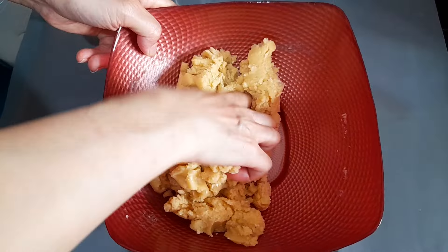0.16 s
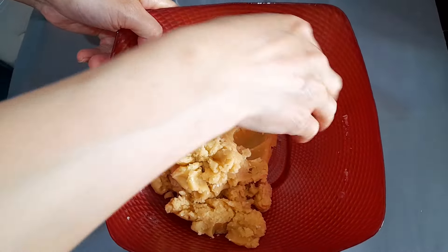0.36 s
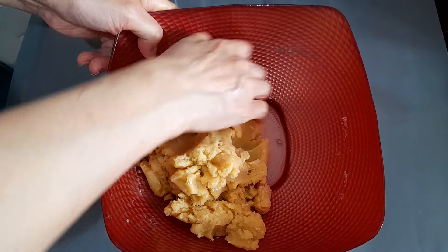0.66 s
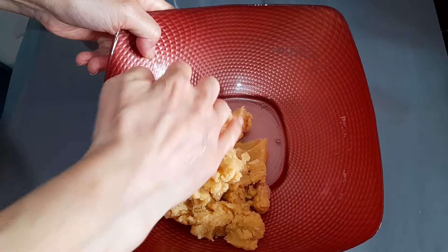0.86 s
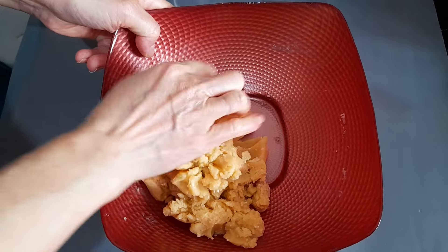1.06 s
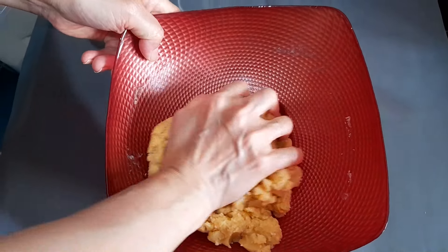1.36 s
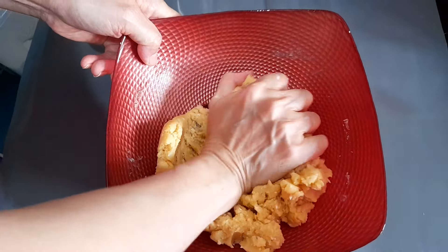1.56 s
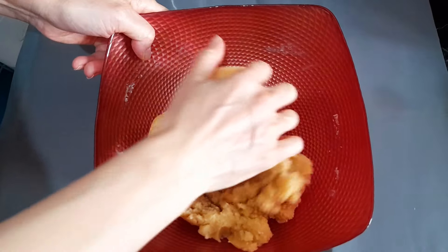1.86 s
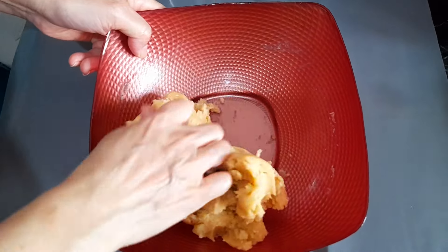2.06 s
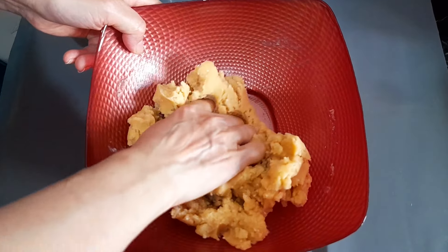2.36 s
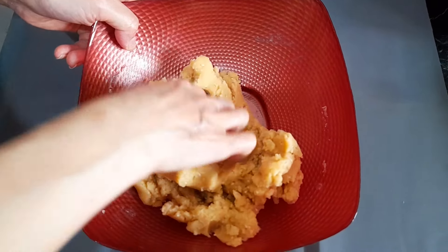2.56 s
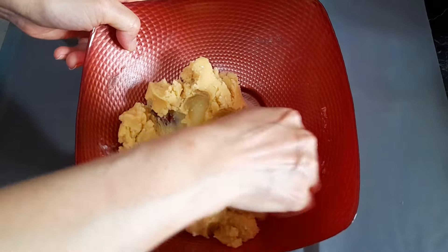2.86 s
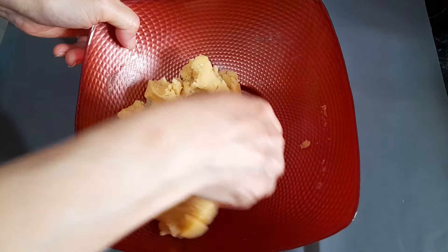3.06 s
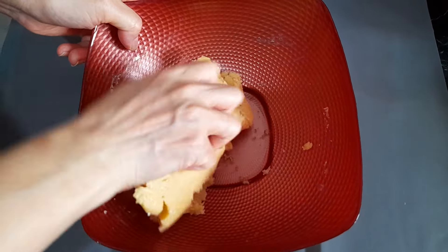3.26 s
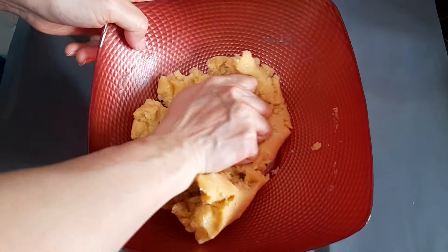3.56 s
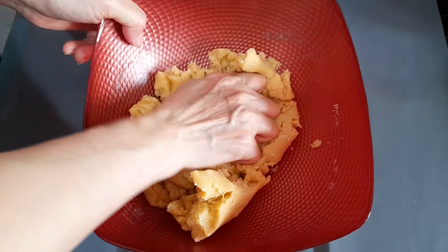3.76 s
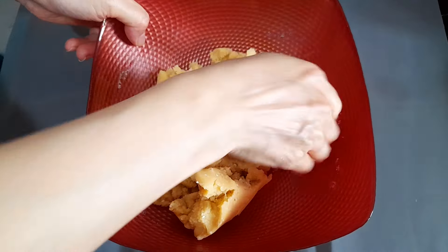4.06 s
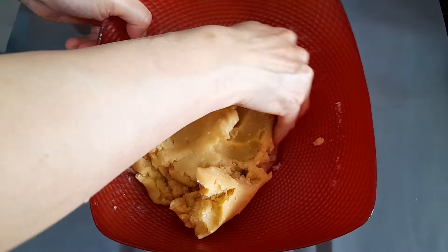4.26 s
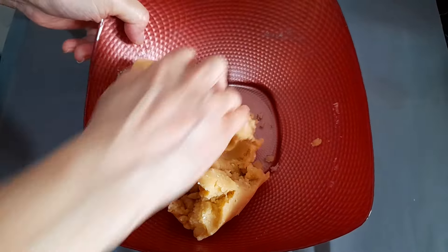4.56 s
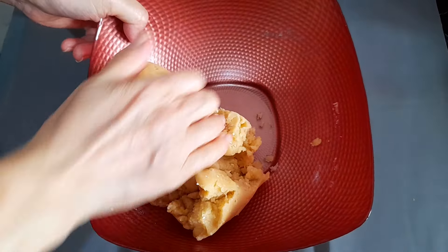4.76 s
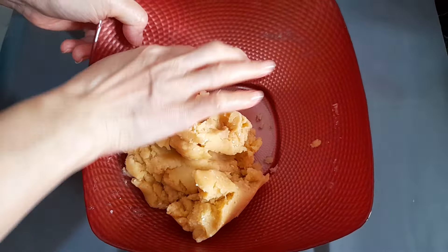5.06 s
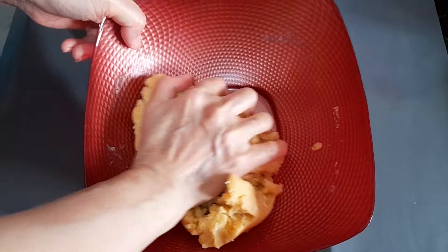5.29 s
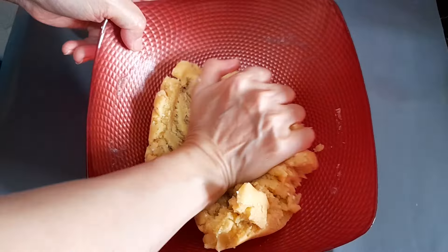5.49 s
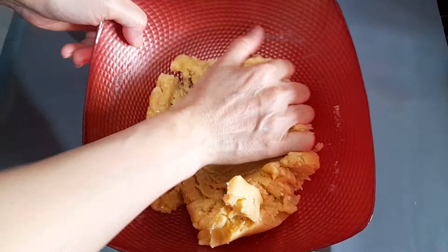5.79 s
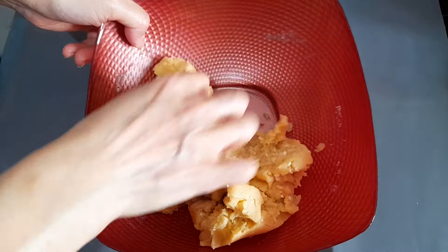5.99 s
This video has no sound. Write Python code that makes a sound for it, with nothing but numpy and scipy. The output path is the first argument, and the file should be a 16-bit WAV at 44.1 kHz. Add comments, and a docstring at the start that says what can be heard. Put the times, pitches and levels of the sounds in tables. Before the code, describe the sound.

Sticky dough is pressed and folded, fizzing and squelching as each push rocks the plastic bowl against the table with low, hollow knocks.

```python
"""Kneading cookie dough in a bowl

A hand kneads soft, oily cookie dough in a plastic bowl that the other hand steadies on a kitchen table.
Each push rocks the bowl with a dull judder, made from bounces that ring its modes, and slaps the dough.
Random tiny snaps become the dough's fizz, its gliding squelches, the rub along the wall and a rumble.
Short noise bursts make finger ticks and knuckle bumps, wavering tones the faint squeaks of the bowl's foot.
"""
import sys
import numpy as np
from scipy import signal
from scipy.fft import rfft, irfft, next_fast_len
from scipy.io import wavfile

SR = 44100
rng = np.random.default_rng(int(sys.argv[2]) if len(sys.argv) > 2 else 0)


def waveform_to_disk(signal):
    """Save audio, clipped to [-1, 1], as 16-bit WAV at the path in sys.argv[1]."""
    frames = np.transpose(np.atleast_2d(signal))
    scaled = np.clip(frames, -1, 1) * 32767
    samples = np.round(scaled).astype(np.int16)
    wavfile.write(sys.argv[1], SR, samples)


N = 270333

# the hand grips, drags or presses the dough; levels are before each sound's own trim:
# start_s, attack_s, hold_s, release_s, fizz_level_db, rub_level_db
DOUGH_STROKES = [(0.0, 0.0017, 0.027, 0.36, -55.5, -67.5), (0.148, 0.074, 0.08, 0.087, -52.5, -57),
                 (0.446, 0.0086, 0.062, .08, -70, -64), (0.553, 0.061, 0.13, 0.13, -60.5, -62),
                 (0.717, 0.033, 0.15, 0.38, -57, -64), (1.068, 0.02, 0.014, 0.065, -57, -42),
                 (1.215, 0.048, 0.081, 0.24, -59.5, -65), (1.383, 0.038, 0.2, 0.17, -49, -54.5),
                 (1.75, 0.029, 0.11, .06, -49.5, -54), (1.858, 0.029, 0.019, 0.098, -44.5, -53.5),
                 (1.955, 0.02, 0.11, 0.42, -56.5, -66), (2.186, .01, .06, .05, -57.5, -62),
                 (2.231, 0.072, 0.049, 0.14, -53, -57.5), (2.493, 0.083, 0.017, 0.017, -51, -57),
                 (2.831, 0.02, 0.03, 0.19, -56.5, -61.5), (2.967, 0.0098, 0.084, 0.055, -57, -58),
                 (3.039, 0.049, 0.052, .14, -45.5, -59), (3.275, 0.1, 0.084, 0.13, -57.5, -66),
                 (3.445, 0.076, 0.038, 0.52, -53.5, -60), (3.759, 0.11, 0.038, 0.028, -45.5, -50.5),
                 (4.095, 0.0035, 0.017, 0.043, -64, -64), (4.185, 0.0056, 0.16, 0.47, -59.5, -65),
                 (4.383, 0.11, 0.1, 0.22, -53.5, -62), (4.696, .04, 0.13, 0.36, -69, -100),
                 (4.974, .015, 0.027, .03, -66.5, -91), (5.04, 0.14, 0.34, .12, -61, -70),
                 (5.274, 0.18, 0.21, .19, -50, -61), (5.737, 0.048, 0.054, 0.026, -51.5, -46.5),
                 (5.82, 0.11, 0.012, 0.13, -47, -53.5), (6.049, 0.013, .02, 0.056, -63.5, -62.5)]
# the bowl rocks against the table; the hard contact is relative to the thud, before a common lift:
# start_s, peak_db, hard_contact_db, judder_length_s, lean_hold_s
BOWL_ROCKS = [(0.002, -41, -13.5, 0.011, 0.062), (0.097, -37, -27.5, 0.046, 0.39),
              (0.464, -41.5, -13.5, .023, 0.071), (0.493, -38.5, -12.5, 0.041, 0.3),
              (0.797, -49, -13, 0.052, 0.33), (1.097, -35, -5, 0.045, 0.028),
              (1.254, -42, -6.5, 0.035, 0.19), (1.368, -30, -15.5, 0.044, 0.087),
              (1.542, -27.5, -19, 0.04, 0.074), (1.799, -38.5, -12.5, 0.032, 0.1),
              (2.007, -52.5, -48, 0.055, 0.089), (2.137, -47.5, -45, 0.0082, 0.015),
              (2.285, -30.5, -19, 0.029, .13), (2.478, -40.5, -28, 0.058, 0.27),
              (2.855, -45.5, -18, 0.056, 0.036), (3.011, -25, -13.5, 0.028, 0.2),
              (3.451, -24.5, -21.5, 0.0389, 0.52), (3.79, -29, -17, 0.031, 0.13),
              (4.099, -43, -17.5, 0.058, 0.13), (4.2, -36, -18, 0.022, 0.026),
              (4.5, -47.5, -40, .04, 0.041), (5.091, -45, -14, 0.017, 0.073),
              (5.189, -44, -12.5, 0.023, 0.067), (5.311, -44, -22.5, 0.03, 0.091),
              (5.777, -33.5, -18, 0.044, 0.28)]
# fingers and crumbs tick on the wall: start_s, peak_db, pitch_hz
WALL_TICKS = [(0.202, -33.5, 8500), (0.4955, -44, 6650), (0.629, -45, 1520), (1.012, -52, 7440),
              (1.288, -47, 2820), (1.316, -32, 7640), (2.839, -43.5, 7000), (3.694, -48, 4970),
              (4.096, -42, 7600), (4.125, -42, 6100), (4.202, -44, 7310), (4.494, -36, 3760),
              (5.164, -44.5, 3440)]
# air and oil squeeze out under the fingers: start_s, length_s, first_pitch_hz, last_pitch_hz, level_db
WET_GLIDES = [(0.202, 0.14, 2550, 3050, -57.5), (1.089, 0.0595, 3150, 2880, -45),
              (1.286, 0.032, 1920, 2540, -55), (1.787, 0.077, 1900, 2940, -55.5),
              (1.892, 0.04, 2007, 2340, -54.5), (2.573, 0.025, 2980, 3180, -65),
              (2.648, 0.11, 2220, 2690, -71.5), (2.975, 0.026, 2110, 2220, -51),
              (3.481, 0.077, 2150, 2380, -56.5), (5.718, 0.09, 2050, 2440, -57)]
# knuckles bump the wall: start_s, peak_db, brightness_hz
WALL_BUMPS = [(0.281, -46.5, 990), (1.105, -45, 2500), (1.317, -42, 1440), (3.175, -59, 605),
              (3.794, -39.5, 620), (5.161, -48, 780), (5.383, -41, 730)]
# the foot of the bowl slips on the table: start_s, length_s, pitch_hz, level_db
FOOT_SLIPS = [(4.668, 0.079, 930, -74), (4.765, 0.13, 917, -76.5), (5.103, 0.1, 954, -67),
              (5.181, .12, 986, -58), (5.295, 0.048, 950, -68)]
# rocking modes of the loaded bowl: pitch_hz, width_hz, gain_db
BOWL_MODES = [(73, 32, -6.5), (99.7, 10.3, 3.5), (134, 26.5, 7.5), (192.3, 21.2, 5.5), (252, 63, -16.5)]
# modes of its thin wall: pitch_hz, width_hz, gain_db
WALL_MODES = [(235, 45, -3), (295, 45, 2), (352, 50, 3), (445, 50, -4), (520, 40, 3), (585, 50, -1),
              (670, 40, -5), (1060, 80, -8), (1190, 70, -9)]
# resonances of the rubbed wall and the hollow of the hand: pitch_hz, width_hz, gain_db
RUB_MODES = [(470, 175, 2), (1096, 164, 3.5), (1420, 2020, -3), (2470, 534, 3), (2750, 290, 4),
             (3450, 1280, 1), (4070, 710, 2.5), (6670, 2700, -4.5)]
# standing waves of the kitchen: pitch_hz, width_hz, gain_db
KITCHEN_MODES = [(131, 6, 0), (171, 6, 3), (229, 7, -1), (282, 8, -5)]
# tone colour of the bursting dough: frequency_hz, relative_level_db
FIZZ_COLOUR = [(300, -30), (1200, -10), (2500, -16), (5000, -2), (7500, 2.5), (9200, 5.5), (10500, -0.5),
               (12500, 4.5), (16000, 2.5)]
# tone colour of the background hush: frequency_hz, relative_level_db
HUSH_COLOUR = [(18, -45), (30, -53), (130, 24), (399, 36), (808, -4), (1050, 17), (1680, 6), (3320, -43),
               (6540, -39), (15500, -119)]
# treble colour of the right side, with a deep notch: frequency_hz, gain_db
RIGHT_COLOUR = [(600, 0), (1100, 2), (3000, 2), (6300, 1), (7000, -2.5), (8000, -19), (9000, -21),
                (10000, -13), (11500, -8), (13500, -6.5), (16000, -10)]
# how alike left and right are in a diffuse sound: frequency_hz, likeness (1 is the same, 0 unrelated)
SIDE_LIKENESS = [(60, 0.77), (280, 0.96), (640, 0), (1400, 0), (16000, 0)]

TIME = np.arange(N) / SR  # seconds
HUSH_DB = -68
KITCHEN_T60_S = 0.27  # time for the echo tail to fade by 60 dB
CUTOFF_HZ = 15800
# the dough yields and the sliding slows as a stroke goes on
FIZZ_SAG_DB_PER_S, RUB_SAG_DB_PER_S = 27, 51.5
RESTING_FIZZ_DB, RESTING_RUB_DB = -81, -83.5  # between strokes, before trim
# rumble levels, before trim: after the heaviest knock, and from the hand that holds the rim
LEAN_DB, STEADYING_DB = -35.5, -60
LEAN_FOLLOWS = 0.69  # share of a lighter knock's drop in dB that the rumble follows
LEAN_ATTACK_S, LEAN_RELEASE_S, LEAN_SAG_DB_PER_S = 0.019, 0.077, 37.5
SQUEEZE_RUMBLE_DB = -3.5  # rumble from squeezing, relative to the squeeze, before trim
WALL_FOLLOWS_HARD = 0.39  # share of a knock's hardness in dB that stays in the wall's rumble


def from_db(db):
    """Turn decibels into a plain factor."""
    return 10 ** (np.asarray(db) / 20)


def rms_one(x):
    """Scale a sound to an average strength (RMS) of 1."""
    return x / np.sqrt(np.mean(x ** 2) + 1e-20)


def peak_one(x):
    """Scale a sound so that its highest peak is 1."""
    return x / (np.abs(x).max() + 1e-20)


def at_hz(points, hz):
    """Read a curve between its points, on a log-frequency axis."""
    known_hz, values = np.transpose(points)
    return np.interp(np.log(hz + 1), np.log(known_hz), values)


def add(out, s, sound):
    """Mix a sound in at a time in seconds."""
    start = max(0, round(s * SR))
    out[..., start:start + sound.shape[-1]] += sound[..., :N - start]


def drift(rate):
    """Smooth random wandering of strength 1, with a new target `rate` times a second."""
    knots = rng.standard_normal(N // 100)
    return rms_one(np.interp(TIME * rate, np.arange(len(knots)), knots))


def cut(x, hz, kind, order=2):
    """A plain low-, high- or band-pass."""
    return signal.sosfilt(signal.butter(order, hz, kind, fs=SR, output="sos"), x)


def colour(x, spectrum):
    """Give a sound a smooth frequency response."""
    size = next_fast_len(N + 4096)
    gain = from_db(at_hz(spectrum, np.fft.rfftfreq(size, 1 / SR)))
    return irfft(rfft(x, size) * gain, size)[..., :N]


def spread(pair):
    """Two unrelated sounds become a diffuse field: alike in the bass, unrelated in the treble."""
    size = next_fast_len(N + 4096)
    alike = np.clip(at_hz(SIDE_LIKENESS, np.fft.rfftfreq(size, 1 / SR)), -1, 1)
    mid, side = rfft(pair, size) * np.sqrt([(1 + alike) / 2, (1 - alike) / 2])
    return irfft([mid + side, mid - side], size)[:, :N]


def resonate(x, modes):
    """Parallel resonances, each with its own gain at its peak."""
    out = 0
    for hz, width_hz, db in modes:
        r = np.exp(-np.pi * width_hz / SR)  # a wider mode dies away faster
        poles = [1, -2 * r * np.cos(2 * np.pi * hz / SR), r * r]
        ringing = signal.lfilter([1, 0, -1], poles, x + 1e-18)
        out = out + from_db(db) * (1 - r * r) / 2 * ringing
    return out


def grains(per_s, size_db):
    """Random tiny snaps of uneven size, each reaching the two sides with its own strength."""
    born = rng.random(N) < per_s / SR
    sizes = from_db(size_db * np.minimum(rng.exponential(1, N), 4))
    return rms_one(born * sizes * rng.standard_normal((2, N)) / np.sqrt(per_s))


def kitchen(x, wet_db):
    """Direct sound plus a diffuse echo tail without its bass."""
    t = TIME[:SR // 2]
    tail = rng.standard_normal((2, len(t))) * from_db(-60 * t / KITCHEN_T60_S)
    tail = tail * (t > .004)  # the first echo comes a moment later
    tail = cut(tail / np.sqrt(np.sum(tail ** 2, axis=1, keepdims=True)), 240, "high")
    echo = signal.fftconvolve(x * np.ones((2, 1)), tail, axes=1)[:, :N]
    return x + from_db(wet_db) * spread(echo)


def gesture(s, attack_s, hold_s, release_s, sag_db_per_s):
    """Force builds up, sags while it is held and is let go."""
    age, out = TIME[:SR] - attack_s, np.zeros(N)
    shape = np.interp(age, [-attack_s, 0, hold_s, hold_s + release_s], [0, 1, 1, 0])
    add(out, s, shape * from_db(-sag_db_per_s * np.maximum(age, 0)))
    return out


def together(gains, resting_db):
    """Overlapping gestures add in power over a resting level."""
    return np.sqrt(sum(gain ** 2 for gain in gains) + from_db(resting_db) ** 2)


def squeezing():
    """How hard the dough is squeezed, stroke by stroke."""
    strokes = [from_db(db) * gesture(s, attack_s, hold_s, release_s, FIZZ_SAG_DB_PER_S)
               for s, attack_s, hold_s, release_s, db, _ in DOUGH_STROKES]
    return together(strokes, RESTING_FIZZ_DB)


def sliding():
    """The same strokes drag along the wall, sagging faster than the squeeze."""
    strokes = [from_db(db) * gesture(s, attack_s, hold_s, release_s, RUB_SAG_DB_PER_S)
               for s, attack_s, hold_s, release_s, _, db in DOUGH_STROKES]
    return together(strokes, RESTING_RUB_DB)


def leaning(follows_hard):
    """After each knock the hand's weight stays on the bowl, more after a heavy one; squeezing shifts it too."""
    _, peaks_db, hards_db, _, _ = np.transpose(BOWL_ROCKS)
    leans = []
    for s, db, hard_db, _, lean_s in BOWL_ROCKS:
        weight_db = LEAN_DB + LEAN_FOLLOWS * (db - peaks_db.max())
        hardness_db = follows_hard * (hard_db - hards_db.mean())
        lean = gesture(s, LEAN_ATTACK_S, lean_s, LEAN_RELEASE_S, LEAN_SAG_DB_PER_S)
        leans.append(from_db(weight_db + hardness_db) * lean)
    return together(leans + [from_db(SQUEEZE_RUMBLE_DB) * squeezing()], STEADYING_DB)


def faint_hush():
    """Steady coloured noise, wide in the treble, lies under everything."""
    return from_db(HUSH_DB) * rms_one(colour(spread(rng.standard_normal((2, N))), HUSH_COLOUR))


def dough_fizz(per_s=14000, clump_db=1.68, trim_db=3):
    """Oily films and air pockets burst; a harder squeeze bursts more of them."""
    squeeze = squeezing()
    pops = grains(per_s * (squeeze / squeeze.max() + .2), size_db=2.1)
    fizz = rms_one(colour(pops, FIZZ_COLOUR)) * squeeze * from_db(trim_db + clump_db * drift(90))
    return kitchen(fizz, wet_db=-9.0)


def wall_rub(stutter_db=2.0, wander_db=1.6):
    """Skin and dough catch and slip on textured plastic; the moving contact favours changing resonances."""
    slips = spread(grains(per_s=2800, size_db=2.5))
    ringing = 0
    for k, mode in enumerate(RUB_MODES):
        sign = (-1) ** k  # neighbours take opposite signs
        ringing = ringing + sign * resonate(slips, [mode]) * from_db(wander_db * drift(35))
    rub = rms_one(cut(ringing, 17000, "low")) * sliding() * from_db(stutter_db * drift(130))
    return kitchen(rub, wet_db=0.0)


def bowl_rumble(per_s=1500, size_db=3.0, wall_db=-8, top_hz=700, trim_db=-5):
    """Small shifts of the loaded bowl keep its modes stirring."""
    shifts = cut(spread(grains(per_s, size_db)), top_hz, "low")
    body = rms_one(resonate(cut(shifts, 131, "low"), BOWL_MODES)) * leaning(0)
    wall = rms_one(resonate(shifts, WALL_MODES)) * leaning(WALL_FOLLOWS_HARD)
    return (body + from_db(wall_db) * wall) * from_db(trim_db)


def bowl_knocks(bounce_s=.0079, unevenness=0.095, growth=0.23, soft_hz=190,
                grit_s=0.0021, scuff_hz=1100, wall_db=2.0, pin_s=.0045):
    """The foot chatters on the table, its thud growing over the bounces, until the push pins it down."""
    t, out = TIME[:SR // 4], np.zeros(N)
    grit_decay = np.exp(-1 / (grit_s * SR))
    for s, db, hard_db, judder_s, _ in BOWL_ROCKS:
        gaps = bounce_s * (1 + unevenness * rng.standard_normal(12))
        touches = np.cumsum(gaps) - gaps[0]
        force = np.zeros(len(t))
        # the last touches weaken, and none is left after the judder
        force[(touches * SR).astype(int)] = np.clip((judder_s - touches) / bounce_s, 0, 1)
        damping = np.exp(-np.maximum(t - judder_s, 0) / pin_s)
        push = cut(force * (1 + growth * t / judder_s), soft_hz, "low")
        thud = resonate(push, BOWL_MODES) * damping
        # each contact is a short gritty scuff that sets the wall ringing
        scuff = signal.lfilter([1], [1, -grit_decay], force) * rng.standard_normal(len(t))
        ring = resonate(cut(scuff, scuff_hz, "low"), WALL_MODES)
        add(out, s, from_db(db) * (peak_one(thud) + from_db(hard_db + wall_db) * peak_one(ring)))
    return kitchen(out, wet_db=6.5)


def dough_slaps(hz=1300, width_hz=800, trim_db=-20):
    """With each push the dough is slapped flat: a wet crunch that peaks as the bowl is pinned."""
    t, out = TIME[:SR // 5], np.zeros((2, N))
    crunch = resonate(spread(grains(per_s=1500, size_db=4.5)), [(hz, width_hz, 0)])
    crunch = rms_one(cut(crunch, [950, 2800], "band"))
    for s, db, hard_db, judder_s, _ in BOWL_ROCKS:
        age = t / judder_s
        swell = (age * np.exp(1 - age)) ** 3
        add(out, s, from_db(db + hard_db + trim_db) * swell)
    return kitchen(out * crunch, wet_db=-12)


def finger_ticks(t60_s=0.031):
    """Short bright snaps of nail or crumb on plastic."""
    t, out = TIME[:SR // 10], np.zeros((2, N))
    for s, db, hz in WALL_TICKS:
        snap = rng.standard_normal((2, len(t))) * from_db(-60 * t / t60_s)
        add(out, s, from_db(db) * peak_one(resonate(snap, [(hz, hz / 3, 0)])))
    return kitchen(out, wet_db=-5)


def squelches(width_hz=380, flutter_db=-7.0):
    """A wet resonance glides as the gap between hand and dough changes size."""
    out = np.zeros((2, N))
    wet = rms_one(cut(grains(per_s=2100, size_db=2.5), width_hz, "low"))
    wet = wet * from_db(flutter_db * drift(120))
    for s, length_s, first_hz, last_hz, db in WET_GLIDES:
        during = (TIME > s) & (TIME < s + length_s)
        progress = (TIME[during] - s) / length_s
        phase = 2 * np.pi * np.cumsum(first_hz + (last_hz - first_hz) * progress) / SR
        swell = np.sqrt(np.sin(np.pi * progress))
        # the gliding tone lifts the low wet noise up to its pitch
        out[:, during] += from_db(db) * swell * wet[:, during] * np.sin(phase)
    return kitchen(out, wet_db=-11)


def knuckle_bumps(t60_s=0.026):
    """A knuckle rings mostly the higher modes of the wall; a fleshy touch is duller."""
    t, out = TIME[:SR // 5], np.zeros(N)
    for s, db, bright_hz in WALL_BUMPS:
        touch = rng.standard_normal(len(t)) * from_db(-60 * t / t60_s)
        touch = cut(cut(touch, 560, "high"), bright_hz, "low")
        add(out, s, from_db(db) * peak_one(resonate(touch, WALL_MODES)))
    return kitchen(out, wet_db=5.5)


def foot_squeaks(waver=0.0098, octave_db=-25):
    """Regular stick and slip gives a thin tone that swells and stops."""
    out = np.zeros(N)
    for s, length_s, hz, db in FOOT_SLIPS:
        swell = np.sin(np.pi * np.clip((TIME - s) / length_s, 0, 1) ** 2.1)
        phase = 2 * np.pi * np.cumsum(hz * (1 + waver * drift(150))) / SR
        tone = np.sin(phase) + from_db(octave_db) * np.sin(2 * phase)
        out += from_db(db) * swell * tone
    return kitchen(out, wet_db=-10)


def scene(boom_db=4):
    """The bowl's thuds and rumble wake the room's standing waves; dough, touches and hush join in."""
    bowl = bowl_knocks() + bowl_rumble()
    boom = from_db(boom_db) * resonate(bowl.mean(axis=0), KITCHEN_MODES)
    dough = dough_fizz() + wall_rub() + dough_slaps() + squelches()
    touches = finger_ticks() + knuckle_bumps() + foot_squeaks()
    return faint_hush() + bowl + boom + dough + touches


def record(dry):
    """The right side gets its treble colour; deep bass and the very top are cut."""
    sides = np.array([dry[0], colour(dry[1], RIGHT_COLOUR)])
    sides = cut(sides, 44, "high", order=4)
    return signal.sosfilt(signal.ellip(12, .1, 80, CUTOFF_HZ, fs=SR, output="sos"), sides)


dry = scene()
out = record(dry)
waveform_to_disk(out)
```